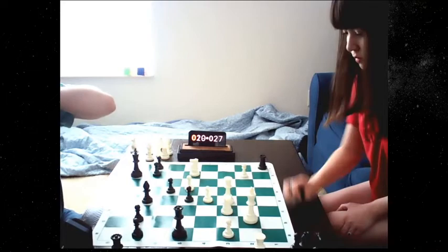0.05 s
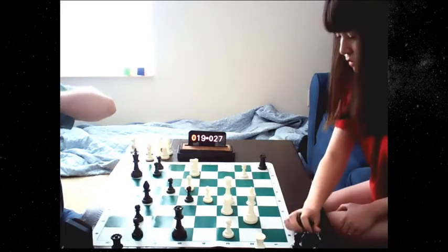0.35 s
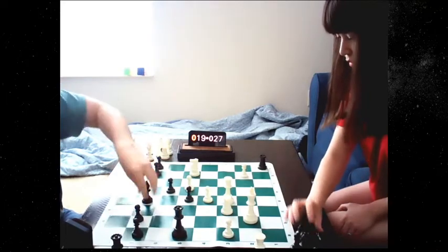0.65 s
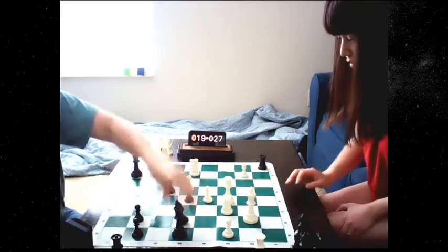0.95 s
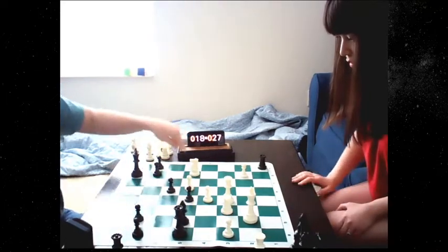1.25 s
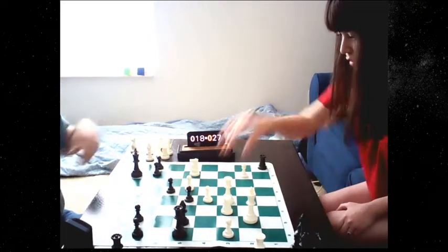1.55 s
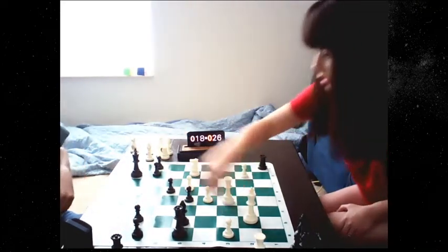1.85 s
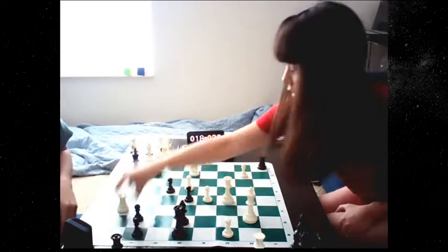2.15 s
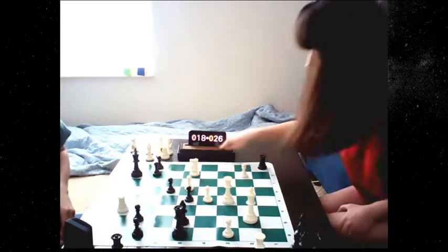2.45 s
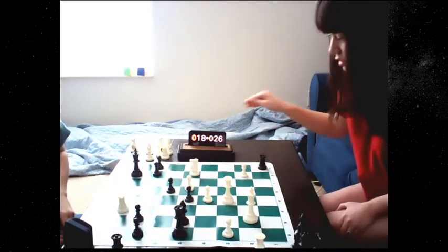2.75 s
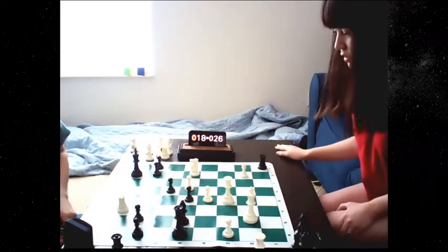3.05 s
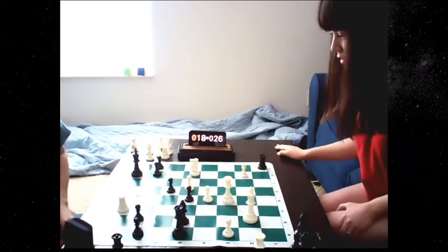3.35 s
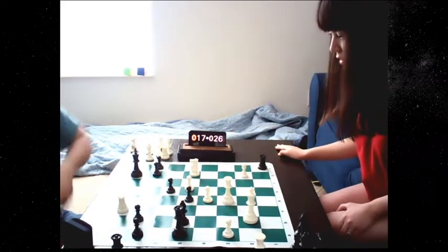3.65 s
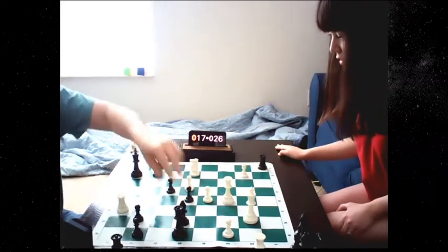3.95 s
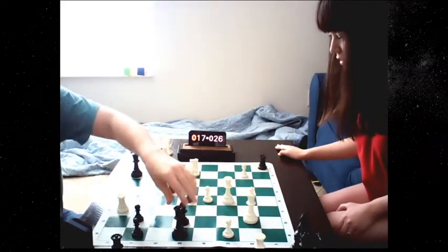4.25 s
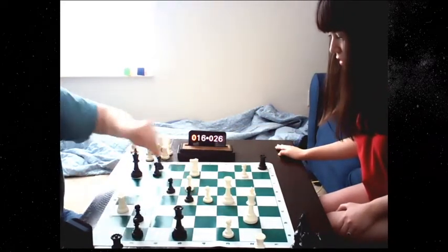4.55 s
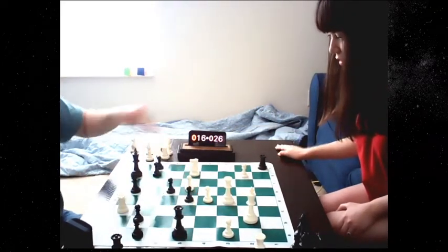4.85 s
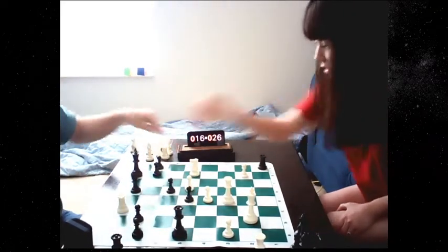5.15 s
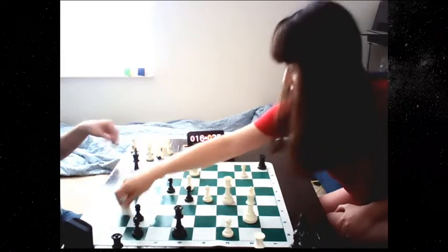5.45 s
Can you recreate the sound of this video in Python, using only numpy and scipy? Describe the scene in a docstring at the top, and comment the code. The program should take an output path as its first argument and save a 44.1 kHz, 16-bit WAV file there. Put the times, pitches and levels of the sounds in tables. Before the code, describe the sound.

Plastic chess pieces knock onto a board on a wooden table, each move answered by a sharp clock clack in a quiet small room.

```python
"""Plastic chess pieces banged down on a roll-up board on a wooden table: blitz in a small bedroom. After each
move a hand slaps the rocker of the clock, which snaps over and knocks on the same table. Between moves the
players shift and rub faintly, a captured piece clinks in a hand, and plastic squeaks under their fingers. One
microphone hears it all over quiet room tone, with near reflections from wall and bodies; the hardest blow
overloads it."""
import sys
import numpy as np
from scipy import signal
from scipy.fft import rfft, irfft, next_fast_len
from scipy.io import wavfile

SR = 44100
rng = np.random.default_rng(int(sys.argv[2]) if len(sys.argv) > 2 else 0)


def master(y):
    """Save y as 16-bit WAV."""
    cut = np.clip(np.atleast_2d(y).T, -1, 1)
    pcm = np.round(cut * 32767)  # scale
    wavfile.write(sys.argv[1], SR, pcm.astype(np.int16))


N = 250929
TIME = np.arange(N) / SR
RING_SIZE = 2 ** 15   # samples given to one blow or one room response


def from_db(db):
    """Decibels to gain."""
    return np.exp(np.asarray(db) * np.log(10) / 20)


def rms_one(x):
    """Scale to unit rms."""
    return x / np.sqrt(np.mean(x ** 2) + 1e-20)


def at_hz(points, hz):
    """Read a table on a log-frequency axis."""
    freqs, values = np.transpose(points)
    return np.interp(np.log(hz), np.log(freqs), values)


def cut(x, hz, kind, order=2):
    """Causal Butterworth filter."""
    edges = np.clip(hz, 10, .47 * SR)
    return signal.sosfilt(signal.butter(order, edges, kind, fs=SR, output="sos"), x + 1e-18)


def resonance(x, hz, width_hz):
    """Two-pole resonance, gain 1 at its peak."""
    r = np.exp(-np.pi * width_hz / SR)
    feedback = [1, -2 * r * np.cos(2 * np.pi * hz / SR), r * r]
    return signal.lfilter(np.array([1, 0, -1]) * (1 - r * r) / 2, feedback, x + 1e-18)


def add(track, s, sound):
    """Mix a sound into a track, starting at s seconds."""
    remaining = track[max(round(s * SR), 0):][:len(sound)]
    remaining += sound[:len(remaining)]


def narrow_noise(size, hz, width_hz, order=2):
    """One band of noise centred on hz."""
    return cut(rng.standard_normal(size), [hz - width_hz / 2, hz + width_hz / 2], "band", order)


def noise_bands(size, count):
    """White noise split into bands: (centre [Hz], band signal)."""
    edges = np.geomspace(20, 18000, count + 1)
    white = rfft(rng.standard_normal(size))
    freqs = np.arange(size // 2 + 1) * SR / size
    return [(np.sqrt(low * high), irfft(white * ((freqs >= low) & (freqs < high)), size))
            for low, high in zip(edges, edges[1:])]


def drift(per_s):
    """A slow wander through random values of spread 1."""
    knots = np.arange(0, N / SR + 1, 1 / per_s)
    return np.interp(TIME, knots, rng.standard_normal(len(knots)))


def room_tone(hush_db=-66.5, waver_db=6.0, waver_top_hz=4000, swell_db=-2.07):
    """Quiet bedroom noise that wavers band by band, with a low drone and a thin hiss."""
    # broad noise floor: (frequency [Hz], relative density [dB])
    floor_spectrum = [(25, -7), (70, -4), (130, -8.5), (200, -17), (350, -8.5), (550, -14), (800, -13),
                      (1400, -22), (3000, -29.5), (7500, -35.5), (10000, -52), (15000, -57.5)]
    # narrow humps of drone and hiss: (frequency [Hz], width [Hz], level [dB])
    humps = [(238, 22, -75.5), (5520, 250, -82.5), (6200, 140, -92), (6420, 80, -92.5), (7830, 200, -98.5),
             (8700, 220, -100)]
    hush = np.zeros(N)
    for hz, band in noise_bands(next_fast_len(N, True), count=22):
        flicker_db = waver_db * drift(per_s=15) / (1 + (hz / waver_top_hz) ** 2)
        hush += band[:N] * from_db(at_hz(floor_spectrum, hz) + flicker_db)
    drone = sum(from_db(db) * rms_one(narrow_noise(N, hz, width_hz)) for hz, width_hz, db in humps)
    return (from_db(hush_db) * rms_one(hush) + drone) * from_db(swell_db * drift(per_s=3.3))


def stirring(swing_db=3):
    """Faint stirring in the room: narrow patches of noise swell and fade, each on its own."""
    # patches at steady pitches: (frequency [Hz], width [Hz], base level [dB])
    patches = [(135, 30, -76), (245, 35, -72), (522, 40, -75), (805, 110, -71), (1500, 80, -86),
               (2850, 400, -88)]
    # rise and fall of all patches together: (time [s], gain [dB])
    activity = [(0, -1), (0.6, 8), (1.6, 5), (2.0, -7), (2.8, 5.5), (3.4, -6.5), (4.3, -6.5), (5.4, 0),
                (5.69, -12)]
    out = np.zeros(N)
    for hz, width_hz, db in patches:
        out += rms_one(narrow_noise(N, hz, width_hz)) * from_db(db + swing_db * drift(per_s=9.1))
    return out * from_db(np.interp(TIME, *np.transpose(activity)))


def friction(length_s, db, hz, width_hz):
    """Friction swells and fades in one narrow resonance."""
    noise = narrow_noise(SR // 2, hz, width_hz, order=3)
    swell = np.hanning(int(length_s * SR))[:len(noise)]
    return from_db(db) * swell * rms_one(noise[-len(swell):])


def rubs(q=3.1):
    """Hands and seats rub as the players shift, each rub in one low resonance."""
    # rubs: (time [s], length [s], level [dB], frequency [Hz])
    strokes = [(0.0, 0.047, -56, 510), (0.691, .13, -63.5, 780), (1.647, 0.15, -57.5, 502),
               (3.901, 0.06, -57, 555), (4.194, 0.046, -61, 796), (5.389, 0.15, -58.5, 794),
               (5.633, 0.036, -55, 790)]
    out = np.zeros(N)
    for s, length_s, db, hz in strokes:
        add(out, s, friction(length_s, db, hz, hz / q))
    return out


def bedroom(x, gap_s=0.0015, build_s=0.0026, late_db=-22, late_t60_s=1.0, late_top_hz=1800):
    """The room as the microphone hears it: near reflections, a dense tail, then a weak, dull ring."""
    # colour of the tail: (frequency [Hz], band gain [dB])
    colour = [(60, -2), (170, 7.5), (280, 6.5), (500, 7), (900, 4.5), (1450, 0.5), (2200, 7.5), (4000, 3.5),
              (7000, 1.5), (12000, 3.5)]
    # decay of the tail: (frequency [Hz], t60 [s])
    decay_times = [(100, 0.23), (300, 0.5), (800, .28), (2000, .31), (5000, 0.39), (8000, 0.33),
                   (13000, 0.26)]
    # nearest reflections from wall and bodies: (delay [s], gain [ratio])
    reflections = [(.0029, 0.46), (.0052, 0.34), (.0083, 0.17)]
    t = TIME[:RING_SIZE]
    build = np.clip((t - gap_s) / build_s, 0, 1)
    linger = from_db(late_db) * np.exp(-np.log(1000) * t / late_t60_s)
    response = np.zeros(RING_SIZE)
    for hz, band in noise_bands(RING_SIZE, count=14):
        decay = np.exp(-np.log(1000) * t / at_hz(decay_times, hz))
        shape = build * (decay + linger / (1 + (hz / late_top_hz) ** 2))
        response += from_db(at_hz(colour, hz)) * band * shape / np.sqrt(np.sum(shape ** 2))
    for delay_s, gain in reflections:
        response[round(delay_s * SR)] += gain
    return signal.fftconvolve(x, response)[:len(x)]


def pulse(cutoff_hz, order=4):
    """Force of one contact, peak 1: the softer the contact, the lower its cut-off."""
    force = cut(signal.unit_impulse(RING_SIZE), cutoff_hz, "low", order=order)
    return force / force.max()


def disperse(x, spread, count):
    """Bending waves carry the treble faster than the bass, which smears a click without colouring it."""
    allpass = [-spread, 1, 0, 1, -spread, 0]
    return signal.sosfilt(np.tile(allpass, (count, 1)), x)


def pieces(knock_q=8.1, tick_hz=4300, hard_contact_hz=1300, rattle_lag_s=0.0063):
    """A padded base lands with a dull push, a short knock and a faint tick, and shakes the table."""
    # pieces and hands landing on the table: (time [s], push level [dB], low cut [Hz],
    # contact cut-off [Hz], knock pitch [Hz], knock gain [dB], room gain [dB])
    landings = [(0.1525, -20, 402, 1480, 666, 10, 6), (0.8336, -8, 290, 1162, 219, 6.5, 4),
                (2.0618, -5, 215.8, 1252, 359.5, 0, -2.5), (2.0659, -12.5, 688, 1374, 1090, 2.5, 2),
                (3.000, -33.5, 130, 1656, 301, 1.5, 7.5), (3.010, -37.5, 128, 424, 256, 6, -1),
                (4.317, -52, 150, 394, 317, 3.5, -7), (4.354, -53, 142.6, 300, 219.7, 1.5, -1),
                (4.6145, 2.5, 272.5, 1342, 743, 7, -2.5)]
    out = np.zeros(N)
    for s, db, low_hz, contact_hz, knock_hz, knock_db, room_db in landings:
        push = cut(pulse(contact_hz, order=6), low_hz, "high", order=3)
        knock = from_db(knock_db) * resonance(push, knock_hz, knock_hz / knock_q)
        tick_db = -25.5 + 27 * np.log2(contact_hz / hard_contact_hz)   # harder contacts tick more
        tick = from_db(tick_db) * cut(pulse(tick_hz, order=6), contact_hz, "high")
        blow = from_db(db) * disperse(push + knock + tick, spread=0.84, count=4)
        add(blow, rattle_lag_s, rattle(db))
        ring_db = 2 + 0.7 * room_db   # with distance, ring and room both gain on the direct sound
        add(out, s, blow + from_db(ring_db) * table_ring(blow) + from_db(room_db) * bedroom(blow))
    return out


def table_ring(force):
    """The wooden table's modes, set ringing by a blow."""
    # table top with board: (frequency [Hz], gain over the plain blow [dB], t60 [s])
    modes = [(143, 14, 0.19), (232.8, 20, 0.35), (316, 17, 0.14), (361, 14.5, 0.21), (443, 0, 0.36),
             (465, 12, 0.055), (535, 11, 0.3), (623.6, 7, 0.15), (640, 12, 0.049), (822, 8.5, 0.14),
             (844, 11, 0.27), (982, 8, 0.033), (1048, 1.5, 0.41), (1084, 4, .22), (1136, 8, 0.44),
             (1236, 1, 0.091), (1440, -1, 0.071), (1720, -2, .2)]
    return sum(from_db(db) * resonance(force, hz, np.log(1000) / (np.pi * t60)) for hz, db, t60 in modes)


def rattle(blow_db, decay_s=0.01, hz=7000, width_hz=3000, top_hz=8000):
    """The other pieces jiggle on the board, louder after a harder blow."""
    jiggle = rng.standard_normal(RING_SIZE) * np.exp(-TIME[:RING_SIZE] / decay_s)
    chatter = resonance(resonance(jiggle, hz, width_hz), hz, width_hz)
    return from_db(-46 + 0.84 * blow_db) * cut(chatter, top_hz, "low", order=6)


def clink_and_squeak(second_width_hz=170):
    """A captured piece clinks in a hand, then plastic squeaks under the fingers; each sounds in two high
    resonances."""
    # clink, then squeak: (time [s], length [s], level [dB], frequency [Hz], width [Hz], second resonance [Hz],
    # its level against the first [dB])
    slips = [(0.467, 0.02, -44, 4390, 1400, 7300, -15.5), (0.59, 0.06, -57, 6144, 500, 2992, -5)]
    out = np.zeros(N)
    for s, length_s, db, hz, width_hz, second_hz, second_db in slips:
        add(out, s, friction(length_s, db, hz, width_hz))
        add(out, s, friction(length_s, db + second_db, second_hz, second_width_hz))
    return out


def rocker_clack(snap_db, thud_db, snap_hz, edge_hz=7900, crisp_hz=12500, thud_hz=1050, lag_s=0.0013):
    """One contact of the rocker: the plastic snaps and rings; just after, the case thuds on the table."""
    # plastic case and rocker: (frequency [Hz], width [Hz], gain over the plain snap [dB])
    case_modes = [(710, 100, 6), (1020, 1000, 3), (2266, 21, 2.5), (2440, 21, 0.5), (2740, 30, -2.5),
                  (2971, 60, 2), (4552, 71, 0), (4300, 89, 4.5)]
    contact = pulse(snap_hz, order=2)
    snap = cut(disperse(contact, spread=0.626, count=24), edge_hz, "low", order=10)
    crispness = from_db(-24) * cut(contact, crisp_hz, "low", order=6)   # reaches above the treble edge
    force = from_db(snap_db) * cut(snap + crispness, hz=1400, kind="high")
    thud = cut(pulse(thud_hz), hz=130, kind="high", order=3)
    add(force, lag_s, -from_db(thud_db) * thud)
    return force + sum(from_db(db) * resonance(force, hz, width_hz) for hz, width_hz, db in case_modes)


def clock(touch_lead_s=0.0215, tilt_lead_s=0.0143, ring_db=-5):
    """A hand slaps the clock: three quick contacts, each ringing the table and the room."""
    # presses: (snap time [s], snap gain [dB], snap cut-off [Hz], finger gain [dB], room gain [dB])
    presses = [(1.1423, -1.5, 7640, -28, 0), (2.4041, -1.5, 5460, -20.5, -1.5),
               (4.9476, 1.5, 8900, -32.5, -1)]
    out = np.zeros(N)
    for s, db, snap_hz, finger_db, room_db in presses:
        # (time [s], snap gain [dB], thud gain [dB])
        contacts = [(s - touch_lead_s, finger_db - 13, finger_db - 6),   # the finger lands
                    (s - tilt_lead_s, finger_db + 2, finger_db - 4.5),   # the rocker tilts
                    (s, db, db - 12)]                                    # it hits its stop
        for onset_s, snap_db, thud_db in contacts:
            clack = rocker_clack(snap_db, thud_db, snap_hz)
            ring = from_db(ring_db) * table_ring(clack)
            add(out, onset_s, clack + ring + from_db(room_db) * bedroom(clack))
    return out


def scene(handling_room_db=-6):
    """Moves, clock presses and small handling sounds over the room tone, at one microphone."""
    game = pieces() + clock()
    handling = rubs() + clink_and_squeak()
    reflected = from_db(handling_room_db) * bedroom(handling)
    return (game + handling + reflected + stirring() + room_tone())[None]


def record(dry, clip_level=0.96, bass_cut_hz=55, treble_stop_hz=16700):
    """The microphone clips hard on the loudest blow; deep bass and the top of the treble are cut."""
    clipped = np.clip(dry, -clip_level, clip_level)
    steep_lowpass = signal.cheby2(14, 70, treble_stop_hz, fs=SR, output="sos")
    return signal.sosfilt(steep_lowpass, cut(clipped, bass_cut_hz, "high", order=1))


dry = scene()
out = record(dry)
master(out)
```